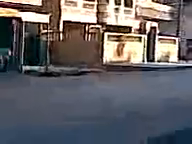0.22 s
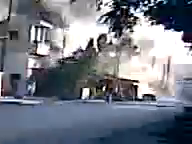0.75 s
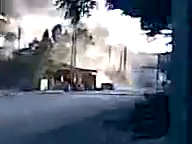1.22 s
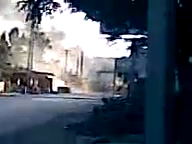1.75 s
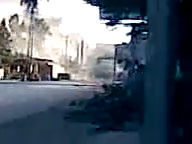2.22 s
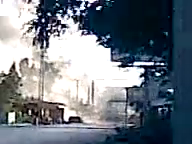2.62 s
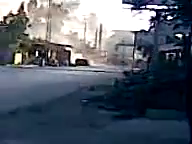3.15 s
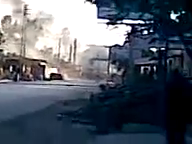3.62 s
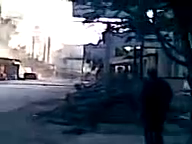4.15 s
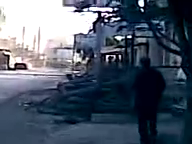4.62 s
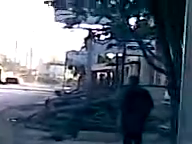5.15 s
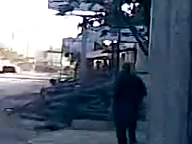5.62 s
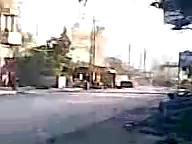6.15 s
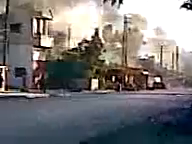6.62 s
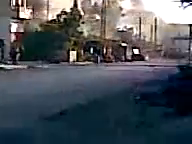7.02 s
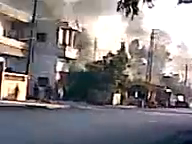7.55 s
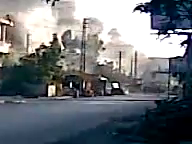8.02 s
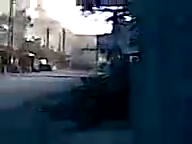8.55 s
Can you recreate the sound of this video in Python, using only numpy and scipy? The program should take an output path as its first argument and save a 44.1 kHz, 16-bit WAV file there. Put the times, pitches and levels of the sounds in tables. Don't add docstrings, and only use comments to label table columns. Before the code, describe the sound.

A street between house fronts, heard through a cheap telephone-band microphone that clips into fizzy distortion. An earlier blast's echo is still rolling at the start. From 0.2 to 0.85 seconds a near rifle fires about eight rapid, hard cracks, with ringing metal. From 1.0 the shots are distant, dull pops with buzzing sheet metal, thinning almost to quiet around 1.8 to 2.5. Middle-distance fire grows from 2.6 to 3.5. A heavy blast bursts at 3.5, weaker near shots follow around 4.0, and another blast lands at 4.3. A dense close burst runs from 4.65 to 5.4, with a blast amid it at 5.07. Thuds and a loud bullet snap come around 5.6 to 5.8, then a big blast at 5.95 whose roar decays. Clustered blasts and deep thuds hit at 6.95 to 7.6, with further blasts near 7.9, 8.35 and 8.6, echoes rolling to the end.

```python
import sys
import numpy as np
from scipy import signal
from scipy.io import wavfile
from scipy.ndimage import uniform_filter1d

SR = 44100
rng = np.random.default_rng(int(sys.argv[2]) if len(sys.argv) > 2 else 0)


def dump_mix(stems):
    frames = np.atleast_2d(stems).T
    limited = np.clip(frames, -1, 1)
    pcm = np.round(limited * 32767).astype(np.int16)
    wavfile.write(sys.argv[1], SR, pcm)


def level_to_linear(level):
    exponent = np.asarray(level, float) / 20
    return 10 ** exponent


N = 386757

# start_s, report_db, report_pitch_hz, bullet_crack_db
RIFLE_SHOTS = [(.199, -6, 1150, -12), (.243, 1.5, 640, -8), (.353, 0, 690, -10), (.4615, -1, 680, -13),
               (.552, -1.5, 640, -11), (.643, .5, 670, -9), (.7518, .5, 730, -12), (.8438, .5, 630, -10),
               (3.975, -9, 930, -11), (4.093, -10, 900, -20), (4.655, -2.5, 900, -7),
               (4.778, -3.8, 820, -11), (4.855, -2, 900, -10), (4.952, -.5, 900, -8), (5.018, -5, 830, -10),
               (5.19, -4, 1260, -11), (5.217, -2, 830, -14), (5.304, -1.8, 760, -12), (5.412, .5, 825, -8)]
# start_s, report_db, report_pitch_hz, crack_db, echo_t60_s
FAR_SHOTS = [(1.009, -15.5, 506, -28, 0.13), (1.06, -20.5, 520, -47, 0.38), (1.213, -13, 500, -26, 0.15),
             (1.409, -16.5, 470, -27, 0.4), (1.469, -21.5, 504, -16, 0.44), (1.544, -23.5, 480, -48, 0.56),
             (1.571, -23.5, 530, -36, 0.48), (1.701, -30, 570, -24.5, 0.17), (1.775, -26.5, 514, -29, 0.23),
             (1.815, -31, 398, -25.5, 0.25), (1.998, -30, 523, -40, 0.13), (2.036, -33.5, 550, -27, 0.17),
             (2.248, -28, 425, -30, 0.11), (2.276, -28.5, 594, -28, .22), (2.473, -30.5, 413, -31, 0.3),
             (2.508, -25.5, 635, -26, 0.074)]
# start_s, report_db, report_pitch_hz, crack_db, echo_t60_s
MIDDLE_SHOTS = [(2.59, -11, 555, -26, 0.24), (2.63, -26, 563, -25, 0.73), (2.699, -14.5, 486, -31, 0.23),
                (2.76, -20, 494, -26.5, .2), (2.843, -6.5, 565, -19.5, 0.21), (2.95, -14, 430, -25, 0.22),
                (3.049, -6, 596, -10, 0.28), (3.177, -15, 546, -22, .17), (3.213, -12, 515, -35, 0.3),
                (3.413, -16, 587, -37, 0.19), (3.447, -15.5, 513, -37, 0.23),
                (3.491, -17.5, 564, -44, 0.19)]
# start_s, crack_db, crack_pitch_hz, street_echo_db, echo_brightness_db
BLASTS = [(3.538, 1.5, 2280, -10, 1), (4.265, -0.5, 2620, -10, 0), (5.066, 3.5, 2105, -11, -0.2),
          (5.652, -30, 2000, -18.5, -1.5), (5.946, 4, 2475, -11, 0.65), (6.961, 4.5, 2160, -10, 0),
          (7.168, -1, 2780, -14, 6.5), (7.27, -4, 3020, -9, 2.5), (7.871, 0.2, 2810, -10.5, 0.7),
          (8.353, 0.5, 2510, -10.5, 0.5), (8.628, 1.5, 2124, -10, 0.3)]
# start_s, street_echo_db, echo_brightness_db
EARLIER_BLAST = (-0.18, -16, .5)
# start_s, report_db, report_pitch_hz, near_echo_db (re report), echo_t60_s
THUDS = [(3.6616, -7.5, 1277, -13.5, 0.083), (5.615, -7, 1401, -14, .06), (5.697, -1.5, 532, -6, .3),
         (5.79, -1, 580, -5, 0.27), (6.02, -1.5, 562, -14.5, 0.46), (6.9, -33, 537, -5, 0.6),
         (7.238, 9.5, 375, -13.5, 0.16), (7.326, 4.5, 372, -22, 0.44), (7.579, -9, 400, -4.5, 1),
         (7.992, -5.5, 1200, -9.5, 0.14), (8.073, -10.5, 573, -4.5, 0.44), (8.478, -3, 1022, -9, 0.093),
         (3.99, -26, 360, 1.5, 0.63), (4.11, -24, 560, 6, 0.37), (7.39, -3, 400, -4, 0.72),
         (6.06, -10, 630, -0.5, .2), (4.9, -27, 640, -4.5, 0.5), (8.44, -9, 560, -7, 0.16),
         (5.625, -19, 480, 6.5, .6), (.002, -24, 940, 6, 0.38), (7.45, -9, 400, -2.5, 0.56),
         (3.56, -7.5, 700, -2.5, .3)]
# delay_s, level_db
WALL_RETURNS = [(.007, -8.5), (0.015, -17.5), (.02, -31), (.031, -18)]
# start_s, level_db, brightest_hz, ring_t60_s
STRAY_BULLETS = [
    (6.9075, -10, 2900, .035),
    (7.582, -3, 2450, .06),
    (.199, -1.5, 1880, .13),
    (5.618, 3.5, 2300, .06),
    (.279, -20, 1000, .2),
]
# start_s, level_db, brightest_hz, ring_t60_s
RAILING_RINGS = [(.003, -9.5, 1860, 0.34), (.004, -13.5, 3250, 0.21), (6.906, -15.5, 2950, 0.28),
                 (.27, -13, 3050, .6), (.55, -18, 3030, .4), (1.215, -17.5, 2850, .14),
                 (1.415, -21, 3360, .36), (1.48, -17, 1470, .2), (1.714, -22.5, 1500, .14),
                 (2.039, -46, 3360, .2), (2.25, -36, 3400, .2), (2.588, -14.5, 3480, .19),
                 (2.63, -20.5, 2400, .35), (2.72, -22, 3380, .24), (2.845, -17, 3500, .14),
                 (2.975, -21.5, 3320, .2), (3.05, -13, 3400, .12), (3.176, -19.5, 3500, .17),
                 (3.199, -28, 2700, .25), (5.192, -9.5, 2340, .36), (7.6, -9, 1550, .7),
                 (.8, -12.5, 910, .4), (1.011, -22.5, 1100, 0.36), (7.194, 3.5, 2920, 0.24),
                 (7.29, -3, 2920, 0.16), (4.2, -20, 752.4, .2), (3.97, -17, 2680, 0.12),
                 (2.74, -20.5, 2400, 0.26), (2.87, -26, 2450, 0.45), (5.63, -12.5, 2500, 0.28)]

# frequency_hz, density_db (per Hz)
LOW_ROLL = [(15, -76.5), (40, -17), (160, -16.5), (230, -8.5), (560, 0.5), (800, -7), (1100, -23),
            (2000, -93.5)]
MIDDLE_RATTLE = [(400, -41.5), (750, -5), (1000, 5.5), (1300, 2.5), (1700, -1.5), (2300, -36.5),
                 (4000, -96.5)]
HIGH_WASH = [(700, -50.5), (1500, -6), (1900, -2), (2500, 0.5), (3300, 0), (4000, -15), (5000, -3.5),
             (6000, -100)]
HOLLOW_LANE = [(200, -61.5), (400, -13), (500, 0), (620, -1.5), (750, -18), (1200, -57.5)]
WINDOW_HISS = [(900, -54), (1500, -5.5), (1900, -.5), (2600, -0.5), (3100, -10.5), (3700, -49.5)]

# rise_s, first_returns_db, tail_db, tail_t60_s, distant_houses_db
RIFLE_STREET = [(0.0069, -22.5, -33.5, 1, -39), (0.0083, -33, -29, .7, -51.5),
                (0.0064, -30.5, -38.5, 0.76, -55.5), (0.027, -32, -26.5, 0.55, -38.5),
                (0.011, -38.5, -45, 0.52, -60.5)]
FAR_STREET = [(0.013, -17, -25, 0.76, -31.5), (.015, -21, -13.5, 0.18, -43),
              (.015, -22.5, -25, 0.51, -35.5), (0.042, -19, -21.5, .5, -43),
              (0.029, -28.5, -36.5, 0.27, -51)]
MIDDLE_STREET = [(0.016, -21, -16.5, 0.63, -39.5), (0.017, -21, -28.5, 0.34, -45),
                 (0.018, -27, -23, .5, -45.5), (.03, -20.5, -21, .4, -41), (0.018, -31, -31, .5, -44)]
BLAST_STREET = [(0.0095, -1.5, 0.36, 1.3, -39.5), (0.017, 1.5, -5.5, 1.3, -27), (0.012, 4, -8.5, 1.55, -26),
                (0.015, -6.5, -4.5, 1.37, -31.5), (0.0096, 1.5, -10, 1.92, -22)]
FLOOR_DB = (-57.5, -57.5, -59.5, -66, -59.5)
STREET_END_S = (0.68, 0.64, .62, 0.67, 0.68)
BRIGHT_TILT = (-1, 0, 1, -1, 1)

# frequency_hz, gain_db
PHONE_BAND = [(0, 0), (3400, 1.5), (3700, 0), (4000, -4), (4300, -18), (4550, -40), (4800, -100)]


def reports():
    rifle = [(s, db, hz, -14, 0.12) for s, db, hz, _ in RIFLE_SHOTS]
    distant = [(s, db, hz, -7.5, t60) for s, db, hz, _, t60 in FAR_SHOTS + MIDDLE_SHOTS]
    dulling = 1.5
    blasts = [(s, db + 2.5 - dulling * bright_db, 572, -4, 0.57) for s, _, _, db, bright_db in BLASTS]
    return rifle + distant + THUDS + blasts


def shots():
    report_s, echo_width_hz = .0046, 560
    out, t = np.zeros(N), np.arange(SR // 2) / SR
    for s, db, hz, near_db, t60 in reports():
        turns = hz * (t + 0.227 * 0.00164 * (1 - np.exp(-t / 0.00034)))
        modes = np.sin(2 * np.pi * turns)
        modes += 0.2 * np.sin(2 * np.pi * 1.3 * turns)
        modes += 0.29 * np.sin(2 * np.pi * 0.66 * turns)
        ring = modes * (1 - np.exp(-t / .0005)) * np.exp(-(t / report_s) ** 2)
        report = ring.copy()
        for delay, wall_db in WALL_RETURNS:
            flip = rng.choice([-1, 1])
            add(report, delay * rng.uniform(0.73, 1.2), flip * level_to_linear(wall_db) * ring)
        near = ringing_noise(hz, echo_width_hz, len(t))
        near *= (1 - np.exp(-t / 0.0054)) * level_to_linear(near_db - 60 * t / max(t60, .03))
        add(out, s, level_to_linear(db) * (report + near))
    return out


def bullets():
    rifle = [(s, db, 2280, 0.062) for s, _, _, db in RIFLE_SHOTS]
    distant = [(s, db, 1700, 0.034) for s, _, _, db, _ in FAR_SHOTS + MIDDLE_SHOTS]
    blasts = [(s, db, hz, 0.12) for s, db, hz, *_ in BLASTS]
    return rifle + STRAY_BULLETS + distant + blasts


def cracks():
    tick_t60, snap_t60 = 0.0043, .025
    out, t = np.zeros(N), np.arange(SR // 2) / SR
    for s, db, hz, t60 in bullets():
        tick = 2.9 * np.sin(2 * np.pi * hz * t) * level_to_linear(-60 * t / tick_t60)
        snap = ringing_noise(1900, 3300, len(t)) * level_to_linear(-2.5 - 60 * t / snap_t60)
        bounce = ringing_noise(hz, 710, len(t)) * level_to_linear(-3.5 - 60 * t / max(t60, .03))
        onset = 1 - np.exp(-t / .0009)
        add(out, s, level_to_linear(db - 7) * (tick + snap + bounce) * onset)
    return out


def shutters():
    pitch_hz, width_hz, buzz_t60, rise_s = 1016, 240, 0.13, 0.0038
    out, t = np.zeros(N), np.arange(SR // 2) / SR
    for table, share_db in ((FAR_SHOTS, -9), (MIDDLE_SHOTS, -8)):
        for s, db, *_ in table:
            buzz = ringing_noise(pitch_hz, width_hz, len(t)) * (1 - np.exp(-t / rise_s))
            add(out, s, level_to_linear(db + share_db - 4.5 - 60 * t / buzz_t60) * buzz)
    return out


def railings():
    width_hz, rise_s = 470, 0.005
    out, t = np.zeros(N), np.arange(SR // 2) / SR
    for s, db, hz, t60 in RAILING_RINGS:
        ring = ringing_noise(hz, width_hz, len(t)) * (1 - np.exp(-t / rise_s))
        add(out, s, level_to_linear(db - 10 - 60 * t / max(t60, .03)) * ring)
    return out


def roar():
    t, out = np.arange(0, N / SR, .001), 0
    blasts = [EARLIER_BLAST] + [(s, db, bright_db) for s, _, _, db, bright_db in BLASTS]
    gunfire = ((RIFLE_SHOTS, RIFLE_STREET), (FAR_SHOTS, FAR_STREET), (MIDDLE_SHOTS, MIDDLE_STREET))
    for k, colour in enumerate((LOW_ROLL, MIDDLE_RATTLE, HIGH_WASH, HOLLOW_LANE, WINDOW_HISS)):
        guns = [(s, db + BRIGHT_TILT[k] * bright_db, BLAST_STREET[k]) for s, db, bright_db in blasts]
        for table, street in gunfire:
            guns += [(s, db, street[k]) for s, db, *_ in table]
        power = level_to_linear(FLOOR_DB[k]) ** 2 + sum(street_answer(t, *gun, STREET_END_S[k]) for gun in guns)
        level = np.interp(np.arange(N) / SR, t, np.sqrt(power))
        out = out + level * echo_noise(colour, patchy_db=3.0, lumpy_db=1.5)
    return out


def street_answer(t, s, db, shape, end_s):
    first_t60, slap_s, slap_db, end_fall_s = 0.31, .115, -8.5, 0.018
    rise, first_db, tail_db, t60, houses_db = shape
    since = np.maximum(t - s, 0)
    late = np.maximum(since - slap_s, 0)
    first = level_to_linear(first_db - 60 * since / first_t60)
    slap = (1 - np.exp(-late / rise)) * level_to_linear(first_db + slap_db - 60 * late / first_t60)
    tail = level_to_linear(tail_db - 60 * since / t60)
    rolling = first ** 2 + slap ** 2 + tail ** 2 + level_to_linear(houses_db) ** 2
    end = 1 / (1 + np.exp(np.minimum((since - end_s) / end_fall_s, 50)))
    return level_to_linear(db) ** 2 * (1 - np.exp(-since / rise)) ** 2 * rolling * end


def echo_noise(spectrum, patchy_db, lumpy_db):
    frames, hz = N // 128 + 5, np.fft.rfftfreq(512, 1 / SR)
    real, imag, patches = rng.standard_normal((frames, 257, 3)).T
    patches = uniform_filter1d(patches, size=3, axis=0)
    patches = evened(uniform_filter1d(patches, size=10, axis=1))
    lumps = evened(uniform_filter1d(rng.standard_normal(frames), size=3))
    f, db = np.transpose(spectrum)
    colour_db = np.interp(np.log(hz + 1), np.log(f), db, right=-120)
    level_db = colour_db[:, None] + patchy_db * patches + lumpy_db * lumps
    grains = (real + 1j * imag) * level_to_linear(level_db)
    return evened(signal.istft(grains, nperseg=512, noverlap=384)[1][:N])


def ringing_noise(hz, width_hz, length):
    edges = [max(hz - width_hz / 2, 0.56 * hz), hz + width_hz / 2]
    band = signal.butter(2, edges, "band", fs=SR, output="sos")
    return evened(signal.sosfilt(band, rng.standard_normal(length)))


def evened(x):
    return x / np.sqrt(np.mean(x ** 2) + 1e-20)


def add(mix, s, sound):
    part = mix[round(s * SR):][:len(sound)]
    part += sound[:len(part)]


def scene():
    return (shots() + cracks() + shutters() + railings() + roar())[None]


def roll_off(x):
    return signal.sosfilt(signal.butter(12, 16510, fs=SR, output="sos"), x)


def record(dry):
    ceiling = .72
    hz, db = np.transpose(PHONE_BAND + [(SR / 2, -120)])
    edge = signal.firwin2(801, hz, level_to_linear(db), window=("kaiser", 10), fs=SR)
    narrow = signal.oaconvolve(dry, edge[None], "same")
    narrow = signal.sosfilt(signal.butter(2, 62, "high", fs=SR, output="sos"), narrow)
    return roll_off(np.clip(narrow, -ceiling, ceiling))


dry = scene()
out = record(dry)
dump_mix(out)
```